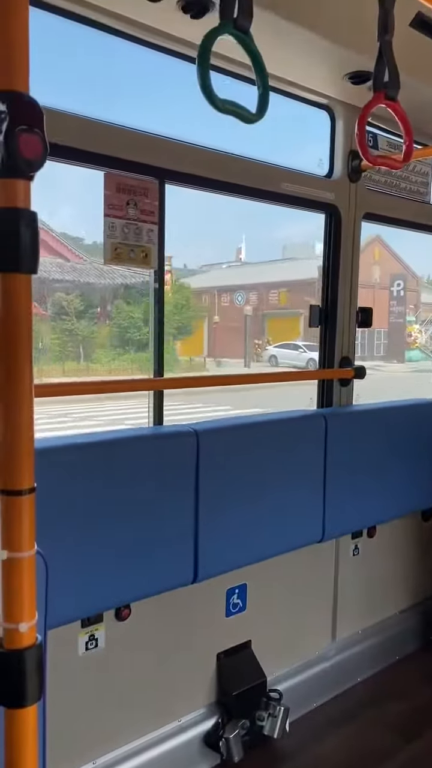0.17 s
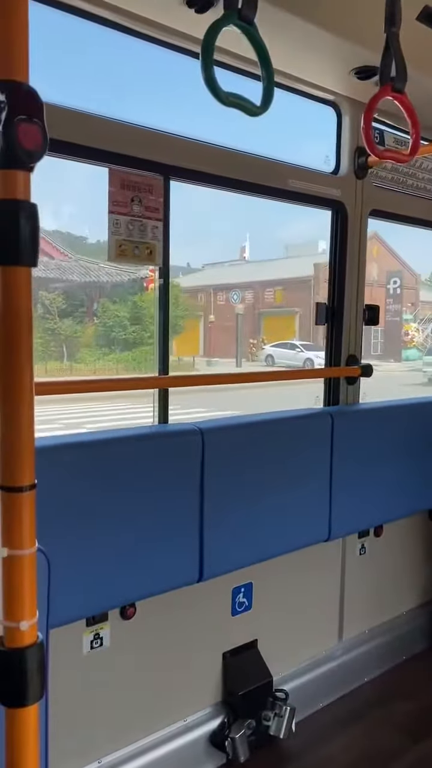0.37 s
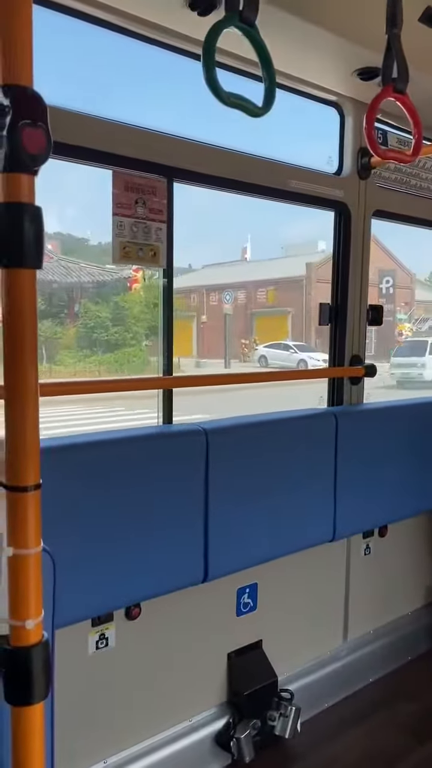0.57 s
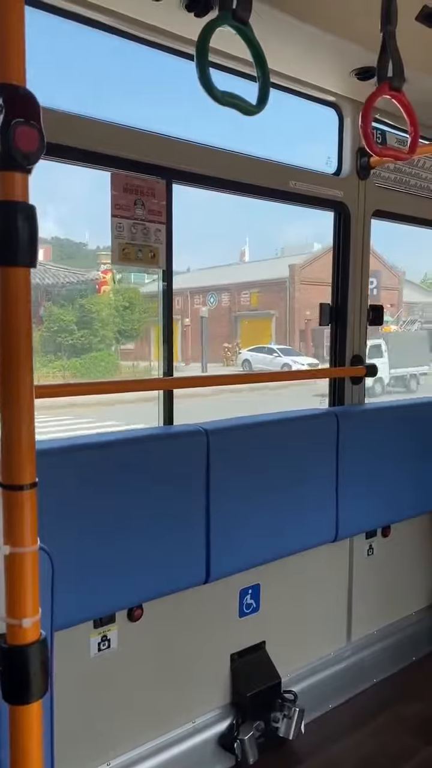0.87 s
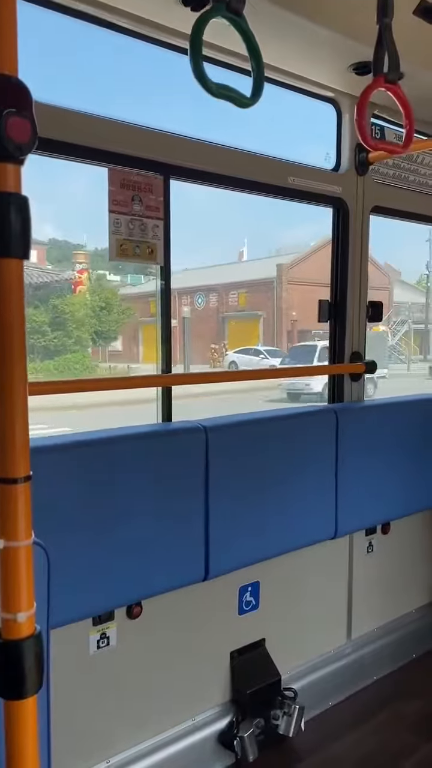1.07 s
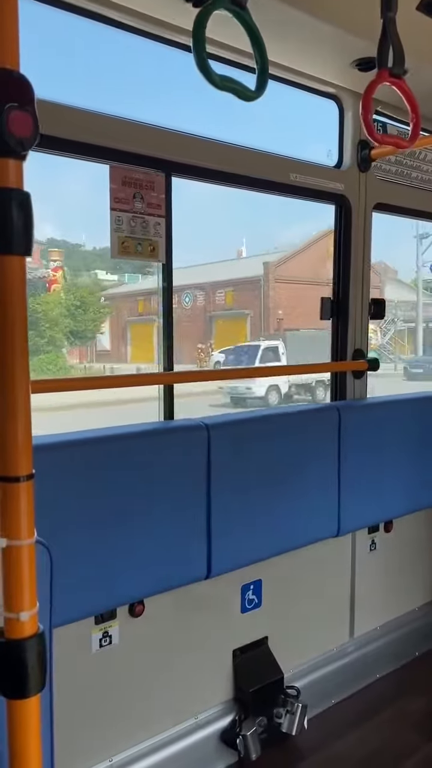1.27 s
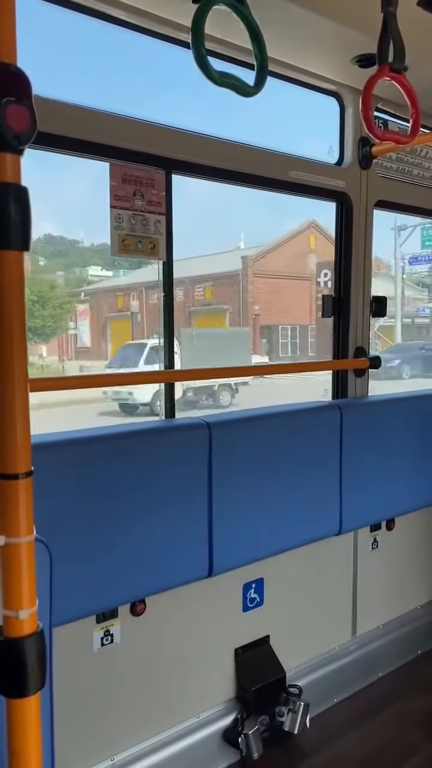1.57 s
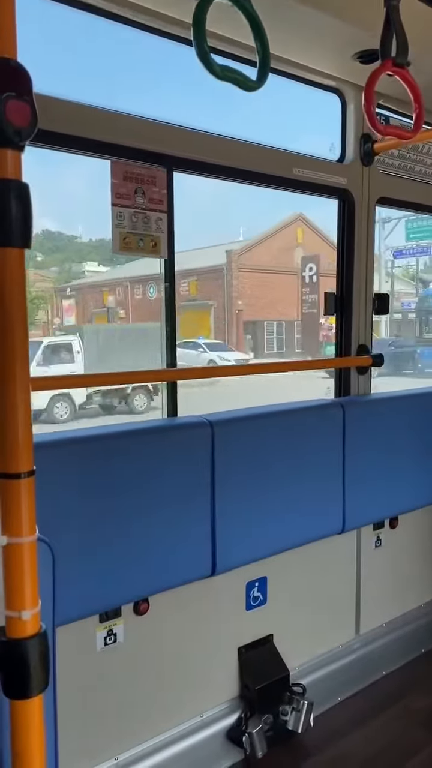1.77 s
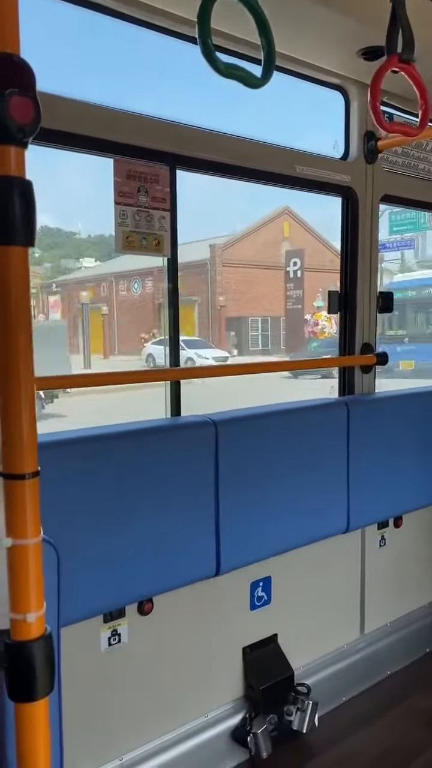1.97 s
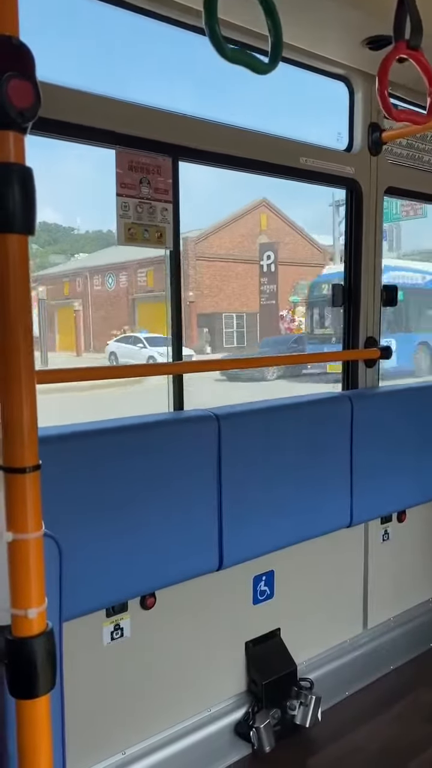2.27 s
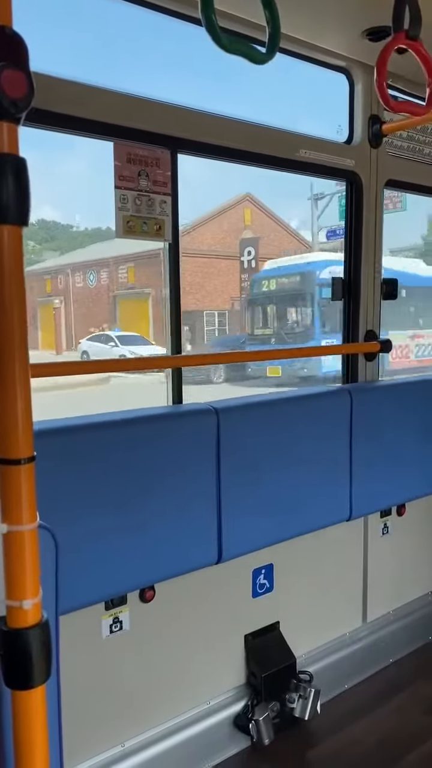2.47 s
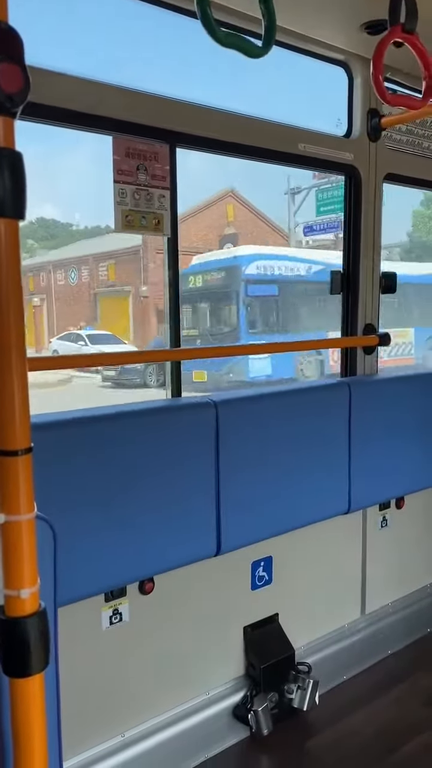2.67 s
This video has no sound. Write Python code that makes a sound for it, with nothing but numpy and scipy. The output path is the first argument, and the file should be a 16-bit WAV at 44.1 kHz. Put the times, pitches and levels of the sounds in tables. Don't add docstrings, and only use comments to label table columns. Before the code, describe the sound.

Inside a city bus picking up speed, a low gear hum climbs steadily over deep, bumpy road rumble; small fittings rattle and panels knock now and then, captured by a close stereo microphone in the cabin.

```python
import sys
import numpy as np
from scipy import signal
from scipy.fft import rfft, irfft, next_fast_len
from scipy.io import wavfile

SR = 44100
rng = np.random.default_rng(int(sys.argv[2]) if len(sys.argv) > 2 else 0)


def to_wav(sig):
    pcm = np.clip(np.atleast_2d(sig), -1, 1) * 32767
    pcm = np.round(pcm).astype(np.int16)
    wavfile.write(sys.argv[1], SR, pcm.T)


def undo_db(level):
    steps = np.asarray(level, float) / 20
    return 10 ** steps


N = 123921

# (time [s], mesh pitch [Hz], road effort [dB], gear load [dB])
BUS_SPEED = [(0, 195.4, -4, -0.5), (0.251, 199.3, -4, -5.5), (.52, 211.8, -4.5, -9), (0.698, 219.7, -4, 2),
             (0.928, 228, -2.5, 0.5), (1.201, 240.1, -1.3, -0.5), (1.48, 250.2, -1.6, 1.5),
             (1.617, 254.6, -2.5, -7), (1.917, 267.5, -0.5, -8), (2.06, 269.7, -1.35, -1.5),
             (2.298, 274.3, 0, -9), (2.599, 279.6, -0.5, -1.5), (2.81, 283.5, -0.7, -0.5)]
# (multiple of mesh pitch [1], level [dB], side level [dB], share of body lift [1])
TURNING_PARTS = [(.135, -40.5, -19.5, 0.78), (.27, -33.5, -19.5, 0.31), (.405, -36.5, -25.5, 0.86),
                 (.62, -41, 1, 0.8), (1, -32.5, -19, 0.81), (1.117, -41.5, 3, 0.49),
                 (2.003, -50.5, 4, 0.44)]
# (frequency [Hz], width [Hz], gain [dB])
BODY_RESONANCES = [(63.4, 18, 3), (83, 4.4, 7), (103.15, 5.7, 10), (166.36, 13, 15), (404, 16, 14),
                   (218.3, 12, 13.5), (249, 2.8, 10), (278.5, 11, 8.5), (524.5, 11, 10)]
# (frequency [Hz], width [Hz], level [dB])
CABIN_MODES = [(64, 7.3, -31.5), (34, 4.6, -30.5), (383, 13.2, -47), (696, 40.2, -49.5), (1347, 30.3, -57)]
# (time [s], level [dB], length [s], frequency [Hz])
HUM_SWELLS = [(.03, -24, 0.062, 50), (0.18, -22.5, .04, 50.95), (.37, -24, 0.042, 78), (.55, -27, .04, 85),
              (0.7, -25, 0.05, 61), (0.73, -26.5, 0.03, 162.5), (0.89, -22, .035, 163),
              (1.021, -15, .022, 58), (1.096, -17.5, 0.035, 64), (1.208, -17, 0.065, 63),
              (1.09, -24, 0.032, 170), (1.37, -20, 0.062, 67.5), (1.612, -20.5, 0.031, 102),
              (1.643, -21, 0.043, 71), (1.787, -26, 0.033, 73), (1.735, -19, .02, 160),
              (1.82, -19, .022, 164), (1.896, -18.5, 0.017, 171), (1.97, -19.5, .025, 169),
              (1.8, -20, 0.021, 168), (2.13, -24, 0.021, 169), (2.092, -19.5, 0.03, 64),
              (2.21, -15.5, 0.021, 168), (2.309, -16.5, 0.021, 168), (2.339, -18, 0.068, 57),
              (2.36, -18.5, .03, 163), (2.449, -16.5, 0.024, 166), (2.512, -15, 0.071, 62),
              (2.35, -23, 0.16, 33), (2.69, -25, 0.064, 172.9), (2.72, -21.5, 0.052, 67),
              (2.4, -33.5, .025, 415), (2.62, -21, .03, 66), (1.1, -21, .02, 80), (0.093, -37, 0.14, 400),
              (1.073, -35.5, 0.053, 456), (1.452, -36, 0.051, 399), (2.433, -33.5, 0.028, 390)]
# (time [s], level [dB], rise [s], t60 [s], brightness [dB/octave])
FITTING_RATTLES = [(0.4544, -42.5, 0.0013, 0.33, 6), (.84, -50, 0.012, 0.5, 6.5),
                   (0.886, -47, 0.0088, 0.3, 3.5), (.918, -49, .004, .25, 9),
                   (1.016, -48, 0.0075, 0.16, 12.5), (1.07, -53, 0.025, 0.29, 5.5),
                   (1.14, -52.5, 0.011, 0.3, -0.5), (2.239, -53, 0.0033, 0.28, 7.5),
                   (2.323, -46.5, 0.014, 0.32, -0.5), (2.395, -48, 0.0037, 0.38, 7),
                   (2.51, -49, 0.016, 0.63, 0)]
# (time [s], level [dB], frequency [Hz], t60 [s])
PANEL_KNOCKS = [
    (.46, -38, 800, 0.15),
    (.99, -34.5, 698, 0.22),
    (1.07, -48, 433, 1),
    (1.188, -38, 800, 0.04),
    (1.149, -48.5, 2100, .1),
    (2.41, -28, 750, 0.04),
    (2.68, -34, 452, .2),
]
# (time [s], level [dB], length [s])
POLE_SQUEAKS = [
    (0.902, -66, 0.023),
    (2.29, -68, 0.025),
    (2.54, -73, 0.022),
]
# (frequency [Hz], level [dB/Hz])
ROAD_SPECTRUM = [(20, -59), (50, -6), (151, -5), (210, -8), (326, -17), (510, -22.5), (800, -24.5),
                 (1200, -33)]
# (frequency [Hz], gain [dB])
SUM_RESPONSE = [(1200, 1.05), (2500, 7.5), (2950, 6), (4200, 15), (6100, 16), (6700, 12), (8300, 13),
                (9300, 18)]
# (frequency [Hz], gain [dB])
TOP_RESPONSE = [(10800, -0.63), (11600, -1.5), (11900, -57)]
# (frequency [Hz], gain [dB])
DIFFERENCE_BASS = [(60, -49), (110, -45), (190, -33), (340, 3.5), (610, 10.5), (1090, 14.5)]
# (frequency [Hz], gain [dB])
DIFFERENCE_TREBLE = [(1200, -12.6), (1800, -13), (2500, -2.5), (3400, -1.5), (5300, -4.5), (6500, 2),
                     (8500, 1.5), (9500, -1.5)]

HIGH_FALL_DB = -14.5


def table(rows, hz):
    r = np.array(rows)
    return np.interp(np.log(hz + 1e-9), np.log(r[:, 0]), r[:, 1])


def colour(x, db_at):
    pad = 2048
    size = next_fast_len(N + 2 * pad)
    wide = np.pad(x, [(0, 0)] * (x.ndim - 1) + [(pad, size - N - pad)], "reflect")
    hz = np.arange(size // 2 + 1) * SR / size
    return irfft(rfft(wide) * undo_db(db_at(hz)), size)[..., pad:N + pad]


def rms_one(x):
    return x / np.sqrt(np.mean(x ** 2) + 1e-20)


def drift(rate_hz):
    r = np.exp(-80 * np.pi * rate_hz / SR)
    slow = signal.lfilter([1], [1, -2 * r, r * r], rng.standard_normal(N // 40 + 2002))[2000:]
    return np.interp(np.arange(N) / 40, np.arange(len(slow)), rms_one(slow - slow.mean()))


def resonate(x, hz, width_hz):
    r = np.exp(-np.pi * width_hz / SR)
    gain = (1 - r * r) / 2
    return signal.lfilter([gain, 0, -gain], [1, -2 * r * np.cos(2 * np.pi * hz / SR), r * r], x)


def swell(s, length):
    return np.exp(-.5 * ((np.arange(N) / SR - s) / length) ** 2)


def strike(s, rise, t60):
    t = np.maximum(np.arange(N) / SR - s, 0)
    return (1 - np.exp(-t / max(rise, 1e-4))) ** 2 * undo_db(-60 * t / t60)


def driveline(mesh_hz, load_db):
    out = np.zeros((2, N))
    for multiple, db, side_db, share in TURNING_PARTS:
        part_hz = multiple * mesh_hz
        hz = part_hz * (1 + .002 * drift(6))
        lift_db = share * sum(g / (1 + (2 * (part_hz - f) / w) ** 2) for f, w, g in BODY_RESONANCES)
        if multiple > .9:
            lift_db = lift_db + load_db
        phase = 2 * np.pi * (np.cumsum(hz) / SR + rng.random((2, 1)))
        level = undo_db(db + lift_db + 1.5 * drift(5))
        out += np.sqrt(2) * level * undo_db(np.array([[0], [side_db]])) * np.sin(phase)
    return out


def wavering_mode(hz, wander_hz):
    cycles = np.cumsum(hz + wander_hz * drift(8)) / SR
    return np.sin(2 * np.pi * (cycles + rng.random((2, 1))))


def boom():
    out = np.zeros((2, N))
    for hz, width_hz, db in CABIN_MODES:
        out += undo_db(db + 2.3 * drift(6.9)) * wavering_mode(hz, width_hz / 2)
    for s, db, length, hz in HUM_SWELLS:
        out += undo_db(db) * swell(s, length) * wavering_mode(hz, 1.0)
    return out


def knocks():
    out = np.zeros((2, N))
    for s, db, hz, t60 in PANEL_KNOCKS:
        ring = resonate(resonate(rng.standard_normal((2, N)), hz, 39), hz, 83)
        out += undo_db(db) * strike(s, 0.0029, t60) * rms_one(ring)
    return out


def rattles():
    out = np.zeros((2, N))
    clicks_per_s, spread_db, tick_db = 1700, 7, 9
    heights = undo_db(spread_db * np.minimum(rng.exponential(1, (2, N)), 3))
    signs = rng.choice([-1, 1], (2, N))
    grains = heights * signs * (rng.random((2, N)) < clicks_per_s / SR)
    grains = rms_one(rms_one(grains) + 3.6 * rng.standard_normal((2, N)))
    for s, db, rise, t60, bright_db in FITTING_RATTLES:
        shape = strike(s, rise, t60)
        if rise < .003:
            shape = shape + undo_db(tick_db) * strike(s, 0.00046, 0.0048)

        def spectrum(hz):
            fall = (HIGH_FALL_DB + bright_db) * np.log2(np.maximum(hz, 1500) / 4000)
            return fall - 14 * np.log2(np.maximum(1500 / (hz + 1), 1))

        out += undo_db(db) * colour(grains * shape, spectrum)
    return colour(out, lambda hz: -8 * np.exp(-((hz - 7500) / 900) ** 4))


def squeaks():
    tone = rms_one(resonate(rng.standard_normal((2, N)), 6500, 35))
    return tone * sum(undo_db(db) * swell(s, length) for s, db, length in POLE_SQUEAKS)


def road(effort_db, patchy_db, follows):
    level_db = -24
    edges = 14 * 2 ** np.arange(0, 10.3, .5)
    together = drift(7)
    white = rng.standard_normal((2, 2, N))
    out = np.zeros((2, N))
    for k, (low, high) in enumerate(zip(edges, edges[1:])):
        band = signal.sosfilt(signal.butter(2, [low, high], "band", fs=SR, output="sos"), white[k % 2])
        share = 1 if low < 2400 else follows
        out += band * undo_db(share * effort_db + patchy_db * (.4 * together + drift(11)))
    top = ROAD_SPECTRUM[-1][0]

    def spectrum(hz):
        fall = HIGH_FALL_DB * np.log2(np.maximum(hz / top, 1))
        return table(ROAD_SPECTRUM, hz) + fall - 30 * (hz < 18)

    out = colour(out, spectrum)
    return undo_db(level_db) * out / np.sqrt(np.mean(out[0] ** 2))


def scene():
    s, *columns = np.transpose(BUS_SPEED)
    mesh_hz, effort_db, load_db = [np.interp(np.arange(N) / SR, s, c) for c in columns]
    cabin = driveline(mesh_hz, load_db) + boom() + knocks() + rattles() + squeaks()
    a, b = cabin + road(effort_db, patchy_db=1.59, follows=0.36)
    return np.array([a + b, a - b])


def roll_off(x):
    return signal.sosfilt(signal.butter(12, 11730, fs=SR, output="sos"), x)


def record(dry):
    a, b = (dry[0] + dry[1]) / 2, (dry[0] - dry[1]) / 2
    mid = colour(a, lambda hz: table(SUM_RESPONSE, hz) + table(TOP_RESPONSE, hz))
    side = colour(b, lambda hz: table(DIFFERENCE_BASS, hz) + table(DIFFERENCE_TREBLE, hz)
                  + table(TOP_RESPONSE, hz))
    lean = signal.sosfilt(signal.butter(2, (200, 1900), "band", fs=SR, output="sos"), mid)
    side = side + .18 * lean
    return roll_off(np.array([mid + side, mid - side]))


dry = scene()
out = record(dry)
to_wav(out)
```